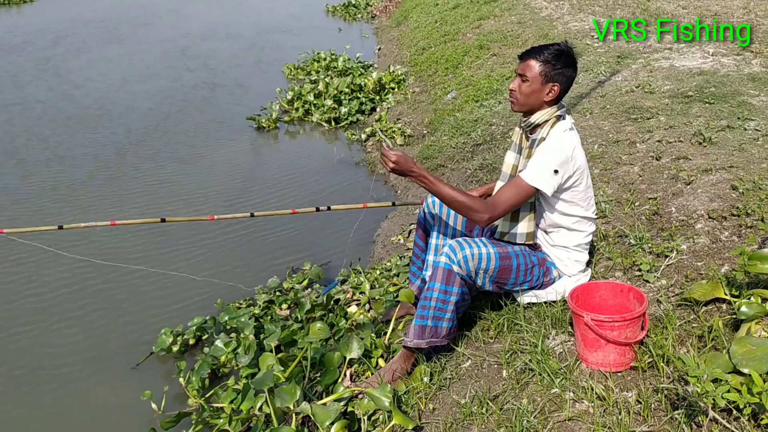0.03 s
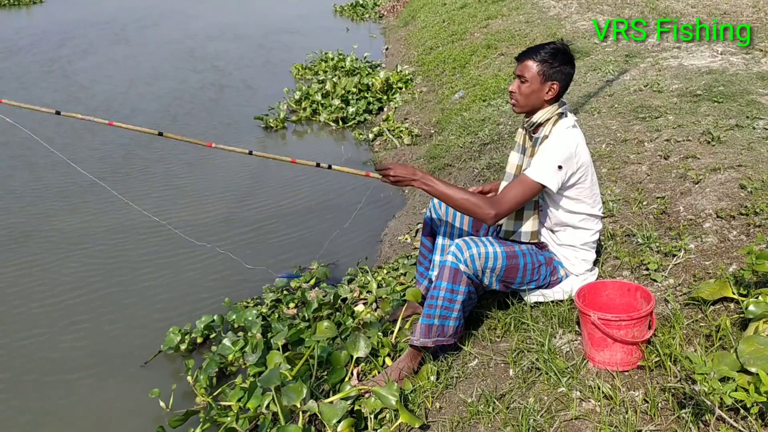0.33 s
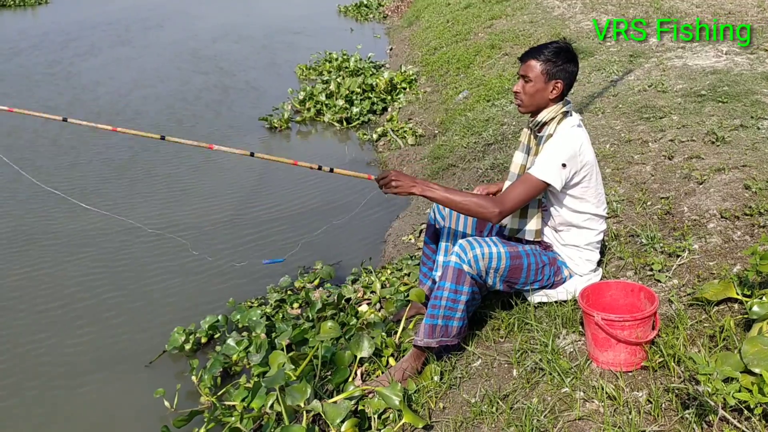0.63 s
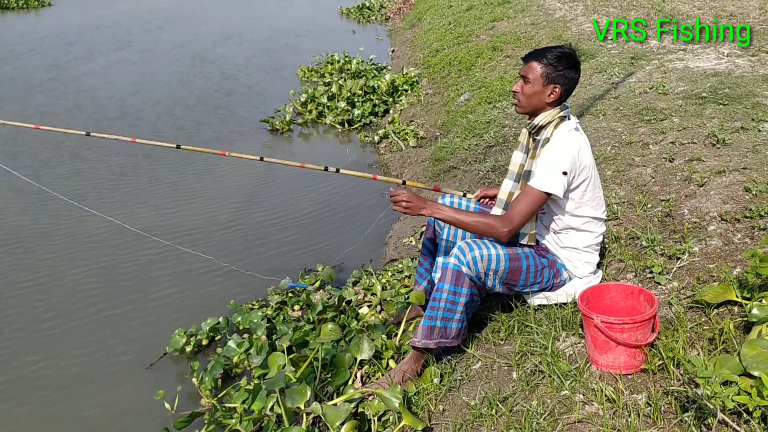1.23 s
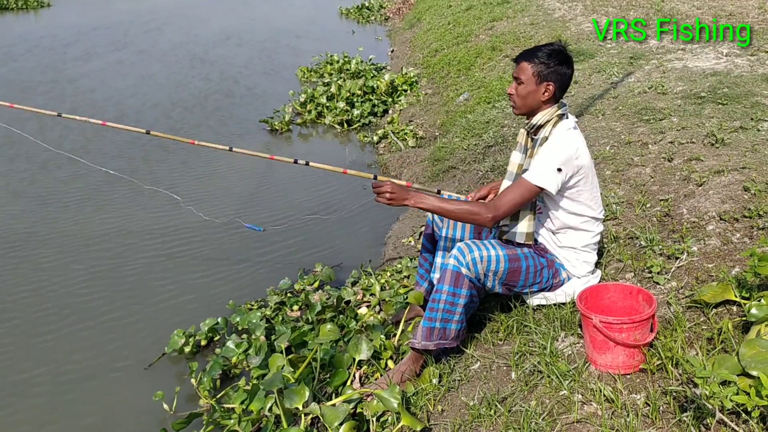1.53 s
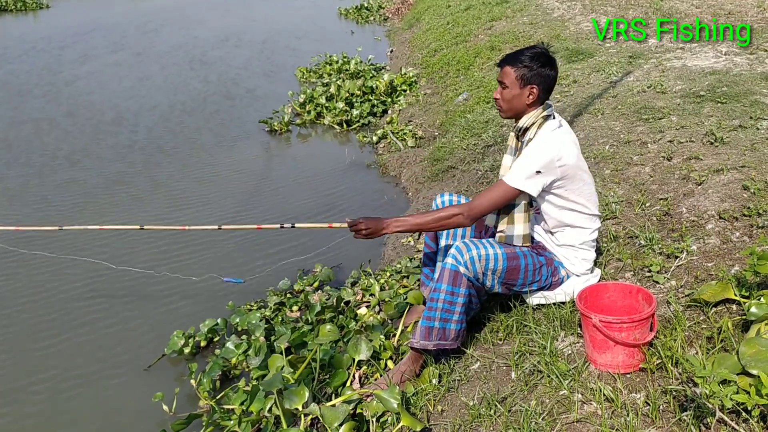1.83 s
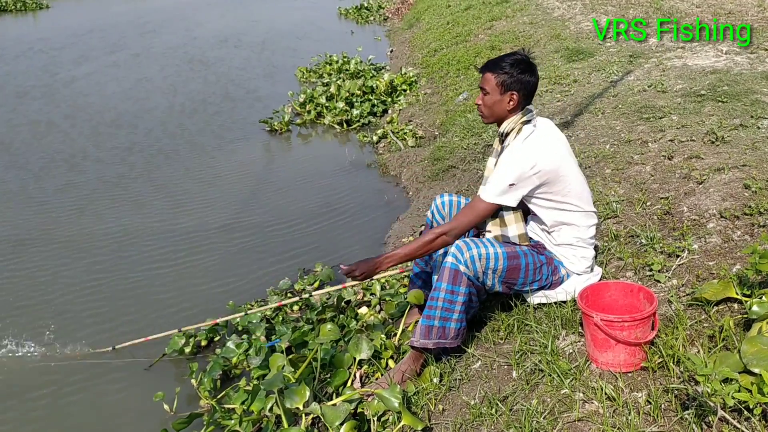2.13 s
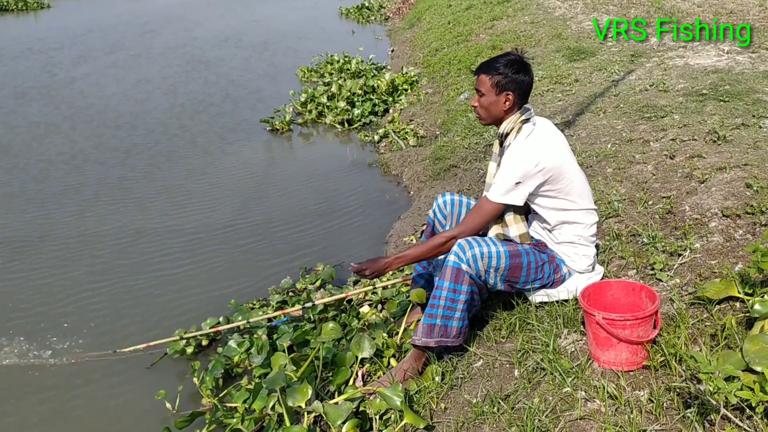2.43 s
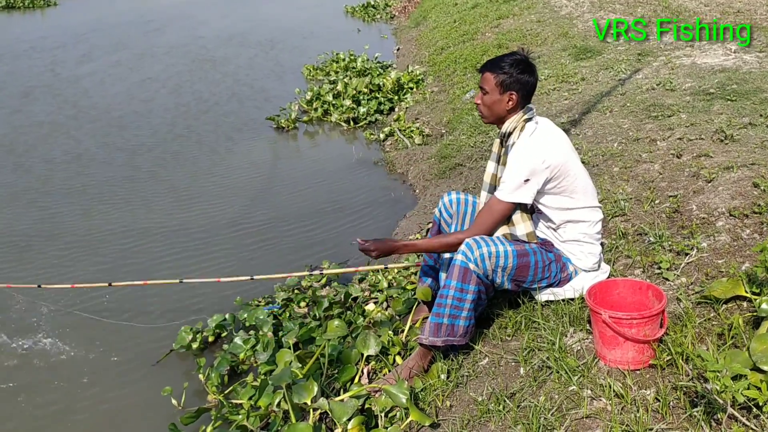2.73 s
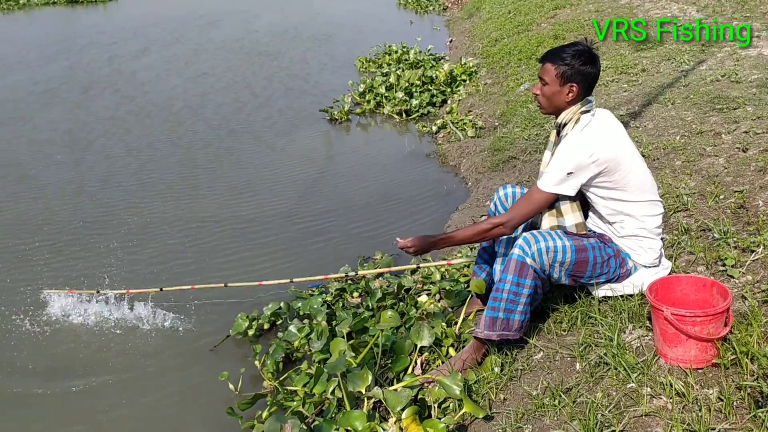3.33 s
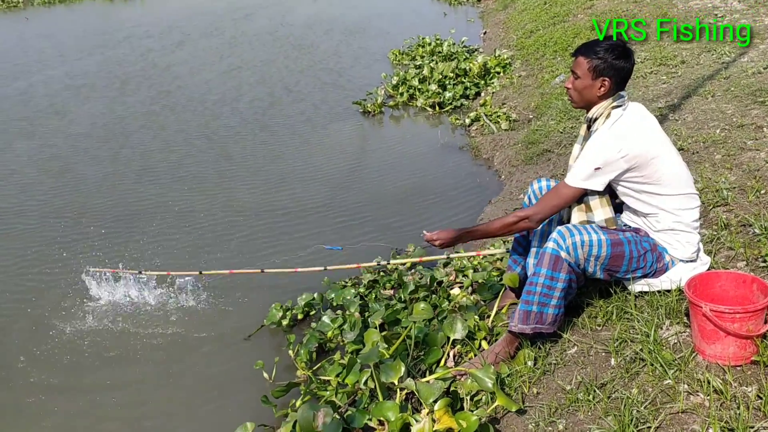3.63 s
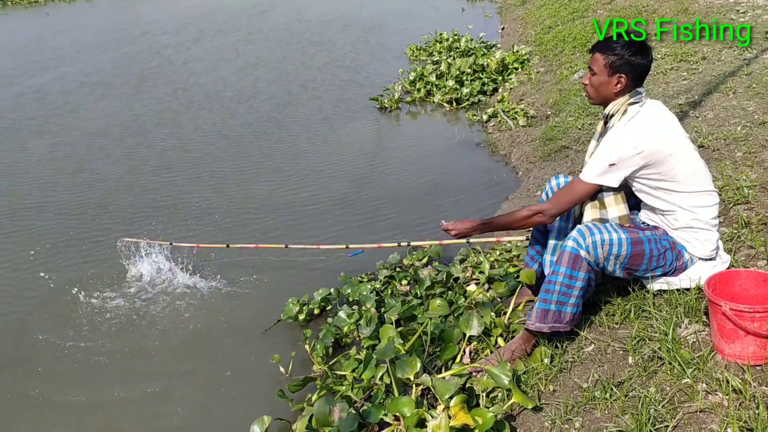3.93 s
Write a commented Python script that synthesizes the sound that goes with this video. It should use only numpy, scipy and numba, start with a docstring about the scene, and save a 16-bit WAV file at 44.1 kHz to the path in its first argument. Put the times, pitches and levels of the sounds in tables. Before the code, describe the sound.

Water splashes as a bamboo fishing rod slaps a pond. First come faint rod knocks and a brief buzzy bird call, then light splashes and louder, gurgling ones with pattering spray. Wind softly buffets the microphone.

```python
"""A bamboo fishing rod is slapped into a pond again and again. Each stroke cracks the surface, the hollow
closes in a burst of tiny ringing bubbles, and spray patters back. Before that the rod is handled,
a sleeve rustles and a bird gives a buzzy call. An insect trills with its wings among the splashes.
Under it all lie quiet air, a distant hiss and a light wind that buffets the two microphone
openings (ports) of a phone on the bank."""
import sys
import numpy as np
from scipy import signal
from scipy.fft import rfft, irfft
from scipy.io import wavfile
from scipy.ndimage import map_coordinates
from numba import njit

SR = 44100
rng = np.random.default_rng(int(sys.argv[2]) if len(sys.argv) > 2 else 0)


def generate_wav(sig):
    """Save sig (samples, or channels by samples) to the path in sys.argv[1] as 16-bit PCM at SR."""
    pcm = np.round(np.clip(np.atleast_2d(sig).T, -1, 1) * 32767).astype(np.int16)
    wavfile.write(sys.argv[1], SR, pcm)


N = 176400  # 4 seconds
PORT_LAG_S, LAG_SCATTER_S = 0.00019, .00004  # sound from the right reaches the left port late


def undb(db):
    """Turn decibels into a gain to multiply by."""
    return 10 ** (np.asarray(db) / 20)


def unit(x):
    """Scale a sound to an average strength (rms) of 1."""
    return x / np.sqrt(np.mean(x ** 2))


def clock():
    """The time of each sample, in seconds."""
    return np.arange(N) / SR


def curve(rows):
    """A gain that follows (time [s], level [dB]) points."""
    return undb(np.interp(clock(), *np.array(rows).T))


def colour(x, points):
    """Turn lows and highs up or down along (frequency [Hz], level [dB]) points."""
    hz, db = np.array(points).T
    size = 4096
    gain = undb(np.interp(np.log(np.arange(size // 2 + 1) * SR / size + 1), np.log(hz), db))
    cepstrum = irfft(np.log(gain))[:size // 2]  # one half only, so nothing rings ahead of the sound
    cepstrum[1:] *= 2
    return signal.fftconvolve(x, irfft(np.exp(rfft(cepstrum, size))))[:N]


def noise(points):
    """Noise of strength 1 with the given tone colour."""
    return unit(colour(rng.standard_normal(N), points))


def wander(rate):
    """Drift smoothly around zero, through `rate` random values a second."""
    return map_coordinates(rng.standard_normal(8192), [clock() * rate], order=2, mode='mirror')


def envelope(start, attack, hold, fade):
    """Rise in a straight line, then die away from `hold` seconds after the start."""
    age = clock() - start
    return np.clip(age / attack, 0, 1) * np.exp(-np.clip((age - hold) / fade, 0, 20))


def pan(db):
    """Left and right gains, with the left louder by `db`."""
    return undb(np.array([[db], [-db]]) / 2)


def aside(x):
    """Place a sound to the right by delaying it at the left port."""
    return np.array([np.roll(x, int(round(PORT_LAG_S * SR))), x])


def echoes(x, fade):
    """A blur of outdoor reflections, different at each port."""
    tails = rng.standard_normal((2, N)) * envelope(0.0056, 0.0013, 0.0033, fade)
    return np.array([signal.fftconvolve(x, tail / np.linalg.norm(tail))[:N] for tail in tails])


@njit
def ring(starts, lags, hz, cycles, size, n):
    """Each bubble rings as a fading tone that rises a little and reaches the left port late."""
    out = np.zeros((2, n))
    for k in range(len(starts)):
        length = cycles[k] * SR / hz[k]
        for port in range(2):
            lag = lags[k] * (1 - port)
            for i in range(min(int(1.5 * length + lag), n - starts[k])):
                life = max(i - lag, 0.) / length
                tone = np.sin(2 * np.pi * cycles[k] * life * (1 + .06 * life))
                out[port, starts[k] + i] += size[k] * np.exp(-4 * life) * tone
    return out


def bubbles(low_hz, high_hz, cycles, per_s, spread_db, clump_db=0):
    """A stream of random bubbles, of strength 1; those of like pitch may come in clumps."""
    when, pitch, life, size, place, chance = rng.random((60000, 6)).T
    on = chance < per_s * N / SR / len(chance)
    hz = np.minimum(low_hz * (high_hz / low_hz) ** pitch[on], SR / 3)  # pitch has a ceiling
    sizes = undb(-spread_db * np.log(.01 + size[on])) * np.sqrt(hz)
    grid = [when[on] * N / SR * 28, np.log2(hz) * 5]  # 28 clumps a second, 5 an octave
    sizes *= undb(clump_db * map_coordinates(rng.standard_normal((128, 64)), grid, order=2, mode='mirror'))
    lags = (PORT_LAG_S + LAG_SCATTER_S * (2 * place[on] - 1)) * SR
    return unit(ring((when[on] * N).astype(np.int64), lags, hz, cycles * (.5 + life[on]), sizes, N))


# tone colour of the air (frequency [Hz], level [dB])
AIR_COLOUR = [(100, 10.5), (500, 2.5), (1200, -1), (2300, -4), (3200, -14), (4500, -11.5), (7000, -24),
              (9500, -26.5), (12000, -21.5), (15000, -30)]
# its loudness (time [s], level [dB])
AIR_LEVELS = [(0, -60), (.9, -60.5), (1.7, -61), (2.6, -59.5), (4, -60.5)]
def air():
    """Quiet country air: a soft, nearly steady noise."""
    return curve(AIR_LEVELS) * np.array([noise(AIR_COLOUR), noise(AIR_COLOUR)])


# tone colour of the hiss (frequency [Hz], level [dB])
HISS_COLOUR = [(1400, -25.5), (2000, 2.5), (2650, -7.5), (3200, -18), (6000, -44)]
# its loudness (time [s], level [dB])
HISS_LEVELS = [(0, -72), (1.0, -81), (1.6, -70.5), (2.2, -74.5), (2.7, -95)]
def distant_hiss():
    """A faint, far hiss swells and fades."""
    return curve(HISS_LEVELS) * np.array([noise(HISS_COLOUR), noise(HISS_COLOUR)])


# tone colour of the wind (frequency [Hz], level [dB])
WIND_COLOUR = [(15, -2), (30, -2), (60, 2), (110, -6), (180, -9), (260, -20), (400, -35.5), (700, -60),
               (1500, -69)]
# its gusts (time [s], level [dB])
GUSTS = [(0.0, -42), (0.52, -46.5), (0.61, -58.5), (0.68, -46), (0.93, -53), (1.01, -41.5), (1.05, -49),
         (2.22, -49.5), (2.28, -39), (2.43, -54.5), (2.63, -42), (2.82, -51.5), (3.07, -37.5), (3.17, -52),
         (3.27, -47.5), (3.31, -53), (3.95, -48.5), (4.0, -45.5)]
def wind():
    """Wind rumbles at each port separately; the right one faces it and also takes the eddies."""
    left, right = (undb(db + 3.5 * wander(14)) * curve(GUSTS) * noise(WIND_COLOUR) for db in (-3, 7))
    muffle = [(450, 3.5), (700, 8.5), (1100, -15), (3000, -63)]
    return np.array([colour(left, muffle), colour(right + eddies(), muffle)])


# touches on the rod (time [s], level [dB], fade [s], left minus right [dB])
TOUCHES = [(0.0968, -36.5, 0.0033, 20.5), (0.174, -43, 0.0015, -3), (0.499, -50.5, 0.025, 18)]
# tone colour of the rod (frequency [Hz], level [dB])
ROD_COLOUR = [(100, -6), (250, 9), (700, -4.5), (1100, -6.5), (1700, -12), (2600, -34), (9000, -42),
              (15000, -53)]
def rod_handling():
    """Hands knock and slide on the bamboo, making dull puffs of noise."""
    return noise(ROD_COLOUR) * sum(undb(db) * pan(side_db) * envelope(start, 0.0016, 0.0026, fade)
                                   for start, db, fade, side_db in TOUCHES)


# swirls of wind (time [s], level [dB], first pitch [Hz], fade [s])
EDDIES = [(0.221, -25.5, 196, 0.0024), (.283, -34, 336, 0.0069), (0.49, -25, 125, 0.013),
          (0.996, -23, 396, 0.019), (1.027, -34.5, 324, 0.0046), (1.093, -28, 254, 0.021),
          (1.334, -38.5, 203, 0.016), (1.372, -33, 250, 0.011), (1.394, -25.5, 272, 0.008),
          (1.577, -26, 563, 0.017), (1.921, -33, 242, 0.021), (2.036, -34, 256, 0.024),
          (2.092, -39.5, 297, 0.012), (2.6, -32, 483, 0.032), (2.689, -32, 350, 0.013),
          (2.955, -29, 246, 0.017), (3.020, -33, 310, 0.013), (3.037, -35.5, 390, 0.016),
          (3.069, -23, 274, 0.014), (3.259, -20.5, 314, 0.016), (3.573, -29, 391, 0.0072),
          (3.979, -29.5, 215, 0.0057)]
# tone colour of the rough air around them (frequency [Hz], level [dB])
WAKE_COLOUR = [(60, -5), (150, 3), (260, -2), (450, -26.5), (900, -47.5)]
def eddies():
    """Each swirl hits the port with a thump that sinks in pitch; rough air leads and follows it."""
    end_hz, sink_s, attack_s, lead_s = 115.7, 0.00852, 0.0028, 0.038
    rough_air = undb(-17) * noise(WAKE_COLOUR)
    out = 0
    for start, db, hz, fade in EDDIES:
        age = np.maximum(clock() - start, 0)
        turns = end_hz * age + (hz - end_hz) * sink_s * (1 - np.exp(-age / sink_s))
        thump = envelope(start, attack_s, attack_s, fade) * np.sin(2 * np.pi * turns)
        wake = rough_air * envelope(start - lead_s, lead_s, lead_s, 0.019)
        out = out + undb(db) * (thump + wake)
    return out


# lone drops (time [s], level [dB])
LONE_DROPS = [(0.338, -63.5), (2.316, -48), (2.355, -54.5), (2.484, -49), (2.559, -50), (2.609, -46),
              (2.825, -49), (2.892, -48.5), (2.971, -52), (3.290, -48), (3.342, -42), (3.5838, -33),
              (3.671, -43.5), (3.796, -61), (3.922, -48)]
def drops():
    """A drop ticks on the water as a very short burst of tiny bubbles."""
    ticks = sum(undb(db) * envelope(start, 0.0015, 0.00033, 0.0038) for start, db in LONE_DROPS)
    return ticks * bubbles(3210, 11350, cycles=14, per_s=2500, spread_db=0.52)


# bird notes (time [s], length [s], level [dB], pitch [Hz], buzz depth [ratio])
BIRD_NOTES = [(0.432, 0.0079, -46.5, 3700, 0.29), (0.466, 0.0038, -49, 3550, 0.53),
              (0.527, 0.06, -51, 3416, 1.18), (0.617, 0.0084, -51.5, 3430, 0.85)]
def bird():
    """Short raspy notes buzz as a tone beats against its neighbours; the far bank echoes them."""
    t, out = clock(), 0
    buzz_hz = 372.3
    waver = np.cumsum(0.0052 * wander(120.2)) / SR
    buzz = 2 * np.pi * np.cumsum(buzz_hz * (1 + 0.0317 * wander(59.8))) / SR
    for start, length, db, hz, depth in BIRD_NOTES:
        phase = 2 * np.pi * hz * (t + waver)
        edges = np.sin(phase - buzz) + np.sin(phase - 2 * buzz) + .5 * np.sin(phase + 2 * buzz)
        tone = np.sin(phase) + depth * (np.sin(phase + buzz) + undb(-18.5) * edges)
        overtones = undb(-21) * np.sin(2 * phase - 3 * buzz + 1.6 * np.sin(buzz))
        rasp = 1 + .3 * wander(700)
        out = out + undb(db) * envelope(start, 0.0027, length, 0.0046) * (tone + overtones) * rasp
    dulled = colour(out, [(2800, 0.5), (3430, -2), (3850, -5.0), (5000, -7)])
    return pan(1) * (out + echoes(dulled, fade=0.063))


# tone colour of the cloth (frequency [Hz], level [dB])
CLOTH_COLOUR = [(500, 2), (2000, 16), (6000, -8), (11000, -3), (15000, -13)]
def sleeve():
    """A sleeve brushes briefly as the rod is lifted."""
    rustle = undb(-67.5 + 2 * wander(149.6)) * envelope(0.464, attack=0.04, hold=0.097, fade=0.048)
    return rustle * np.array([noise(CLOTH_COLOUR), noise(CLOTH_COLOUR)])


# trills (start [s], end [s], first level [dB], last level [dB])
INSECT_TRILLS = [(1.99, 2.126, -78, -64), (2.232, 2.485, -71, -57), (2.554, 2.868, -70, -54),
                 (2.948, 3.295, -64.5, -53.5)]
def insect():
    """Each wing stroke is a raspy falling whistle; each trill swells, speeds up and sinks a little."""
    first_per_s, last_per_s = 77, 92
    top_hz, low_hz, sink_hz = 10100, 8700, 161
    t = clock()
    progress = np.interp(t, np.array(INSECT_TRILLS)[:, :2].ravel(), [0, 1] * len(INSECT_TRILLS))
    rate = first_per_s + (last_per_s - first_per_s) * progress
    strokes = np.cumsum(rate * (1 + 0.07 * wander(40))) / SR
    stroke = strokes % 1  # runs from 0 to 1 in each stroke
    strength = undb(2.2 * rng.standard_normal(1024)[strokes.astype(int)])
    pitch = top_hz + (low_hz - top_hz) * stroke ** .7 + sink_hz * (.5 - progress)
    pitch *= 1 + .008 * wander(90)
    rasp = .35 * wander(1500)
    tone = np.sin(2 * np.pi * np.cumsum(pitch) / SR + rasp)
    swell = sum(undb(np.interp(t, [start, end], levels)) * envelope(start, 0.0018, end - start, 0.0077)
                for start, end, *levels in INSECT_TRILLS)
    return swell * strength * np.sin(np.pi * stroke) ** 2 * tone


# the water breaks or closes (time [s], hold [s], gurgle [dB], crackle [dB], spray [dB], settling [dB])
SURFACE_BREAKS = [(2.188, 0.0011, -71, -62, -53, -69), (2.279, 0.01, -42, -35, -43, -69.5),
                  (2.403, 0.031, -67, -57, -57, -69.5), (2.51, 0.0017, -55, -53, -44, -64.5),
                  (2.537, .025, -67, -59.5, -60, -74), (2.628, .012, -72, -60, -57, -76),
                  (3.244, 0.0053, -83, -39, -30, -65), (3.263, 0.0022, -70, -44, -40, -57),
                  (3.336, 0.012, -37.5, -36, -40, -51.5), (3.568, 0.012, -56, -44, -45, -47.5),
                  (3.586, 0.023, -57, -40, -46.5, -70), (3.659, 0.019, -45, -40.5, -43.5, -54),
                  (3.877, 0.0039, -53, -35, -27, -55), (3.968, 0.01, -41, -33.5, -41, -48)]
# clumps of air break up under water (time [s], level [dB], hold [s])
AIR_CLUMPS = [(2.511, -56, 0.032), (3.389, -40.5, 0.014), (3.422, -34, 0.0097), (3.513, -47.5, 0.016),
              (3.655, -31, 0.0029), (3.682, -34, 0.01), (3.74, -43, 0.033), (3.876, -41.5, 0.014),
              (3.932, -42.5, 0.0084)]
MEDIUM_BUBBLES = dict(low_hz=781, high_hz=1077, cycles=10.6, per_s=2200, spread_db=0.44)
SMALL_BUBBLES = dict(low_hz=1300, high_hz=1494, cycles=14.5, per_s=310, spread_db=2.6)
def splashes():
    """The rod cracks the surface and the hollow closes, each in a dense burst of bubbles."""
    fade_s = 0.0052
    gurgle = crackle = spray = fall_power = drip_power = 0
    for start, hold, gurgle_db, crackle_db, spray_db, settling_db in SURFACE_BREAKS:
        burst = envelope(start, 0.54 * hold, hold, fade_s)
        gurgle += undb(gurgle_db) * burst
        crackle += undb(crackle_db) * burst
        spray += undb(spray_db) * burst
        fall_power += (undb(settling_db) * envelope(start, 0.029, 0.029, 0.22)) ** 2
        drip_power += (undb(settling_db) * envelope(start, 0.063, 0.23, 0.47)) ** 2
    settling = settling_water(np.sqrt(fall_power), np.sqrt(drip_power))
    gurgle += sum(undb(db) * envelope(start, 0.01, hold, fade_s) for start, db, hold in AIR_CLUMPS)
    return (gurgle * (bubbles(**MEDIUM_BUBBLES) + undb(-6) * bubbles(**SMALL_BUBBLES))
            + crackle * bubbles(1487, 4404, cycles=18.5, per_s=7200, spread_db=7.9)
            + spray * bubbles(4840, 16500, cycles=2.9, per_s=13000, spread_db=2)
            + settling)


def settling_water(fall_gain, drip_gain):
    """After a splash, spray patters back, the water churns and the last drips ring."""
    coarse = undb(-1) * bubbles(1300, 5200, cycles=13, per_s=650, spread_db=0.47, clump_db=4.5)
    fine = undb(-2.5) * bubbles(3330, 14600, cycles=13, per_s=3500, spread_db=1.6, clump_db=4.5)
    patter = (coarse + fine) * undb(2.33 * wander(70))
    churn = (undb(-2.5) * bubbles(**MEDIUM_BUBBLES)
             + undb(-10) * bubbles(226, 476, cycles=5.5, per_s=670, spread_db=6.3)
             + undb(-6) * bubbles(**SMALL_BUBBLES))
    drips = undb(-12.5) * bubbles(2700, 7300, cycles=7.5, per_s=700, spread_db=1.3)
    return fall_gain * (patter + churn) + drip_gain * drips


# single bubbles (time [s], first pitch [Hz], level [dB], fade [s], pitch rise [octaves/s])
AIR_POCKETS = [(2.2, 3680, -40.5, 0.0017, 6), (2.282, 3650, -35.5, 0.0032, 6),
               (2.285, 1970, -34, 0.0053, 8), (2.281, 283.3, -36.5, 0.035, 2.5),
               (2.283, 610, -43, 0.006, 23), (2.317, 3960, -45, 0.0027, -1),
               (2.397, 1830, -42.5, 0.0043, 7), (2.454, 3150, -49.5, .003, 6),
               (2.487, 1490, -36, 0.0032, 14), (2.631, 4060, -44.5, 0.0032, 12),
               (2.655, 946, -48.5, 0.007, 9), (2.84, 3850, -55, 0.0027, 1), (2.87, 3800, -52, 0.0023, 14),
               (2.977, 3700, -57.5, 0.0018, 2), (3.345, 1065, -28, 0.005, -11.5),
               (3.401, 893, -27.5, 0.0038, 5.5), (3.356, 330, -40.5, 0.017, 7),
               (3.415, 315, -38, 0.028, 29), (3.43, 238.3, -36.5, 0.03, 8), (3.451, 666, -32.5, 0.0094, 28),
               (3.521, 610, -38.5, 0.011, 13), (3.665, 965, -22.5, 0.0026, 12),
               (3.687, 905, -29.5, .004, 10.5), (3.668, 217, -35, 0.0091, 4),
               (3.772, 785, -34.5, 0.005, -3), (3.947, 845, -46, 0.0057, 12.5)]
def glugs():
    """Single pockets of air swell, ring and glide in pitch as they near the surface."""
    out = np.zeros(N + SR)
    age = np.arange(SR // 3) / SR
    for start, hz, db, fade, rise in AIR_POCKETS:
        pitch = hz * 2 ** np.clip(rise * age, -1, 1.5)
        attack = 1.7 / hz  # swells over 1.7 cycles
        shape = np.minimum(age / attack, 1) * np.exp(-np.maximum(age - attack, 0) / fade)
        first = int(start * SR)
        out[first:first + len(age)] += undb(db) * shape * np.sin(2 * np.pi * np.cumsum(pitch) / SR)
    return out[:N] * (1 + .33 * wander(300))  # the level wobbles


def scene():
    """Water and insect lie to one side, the bank reflects the water, and quiet air surrounds it all."""
    water = splashes() + aside(glugs()) + drops()
    background = air() + distant_hiss() + aside(insect())
    bank_echo = undb(-13.5) * echoes(water[1], fade=0.016)
    return water + bank_echo + background + rod_handling() + sleeve() + bird() + wind()


# how the left port colours sound (frequency [Hz], level [dB])
LEFT_PORT = [(500, -3), (1000, 2), (1900, -0.5), (2700, 7), (3400, 9.5), (4400, -3), (5100, 0.5),
             (6500, -2), (9000, 2), (10500, -2), (12000, 4), (15500, -12)]
# how the right port colours sound (frequency [Hz], level [dB])
RIGHT_PORT = [(500, -2), (1000, 1), (1700, 2.5), (2400, 6.5), (3600, 2), (5200, 0), (7000, 9.5),
              (8800, 17.5), (10000, 15.5), (11300, -0.5), (15500, -7.5)]
def record(dry):
    """Each port colours the sound in its own way, and the highest treble is cut."""
    top_hz = 15800
    ports = np.array([colour(dry[0], LEFT_PORT), colour(dry[1], RIGHT_PORT)])
    return signal.sosfilt(signal.ellip(10, .2, 80, top_hz, fs=SR, output='sos'), ports)


dry = scene()
out = record(dry)
generate_wav(out)
```